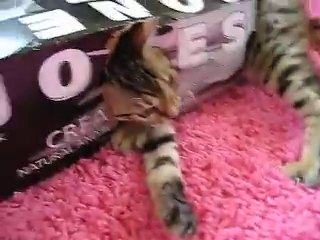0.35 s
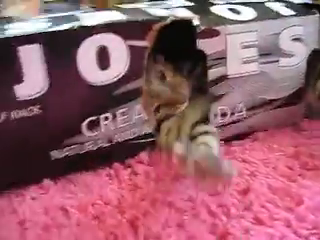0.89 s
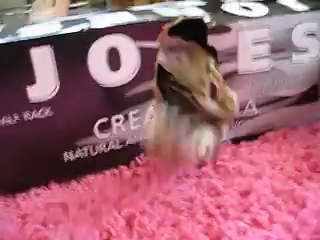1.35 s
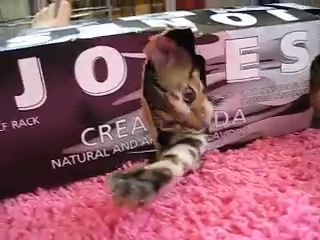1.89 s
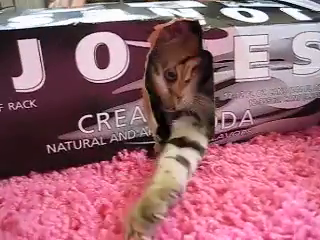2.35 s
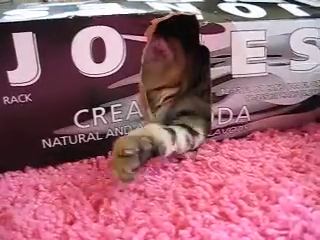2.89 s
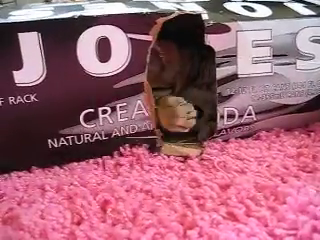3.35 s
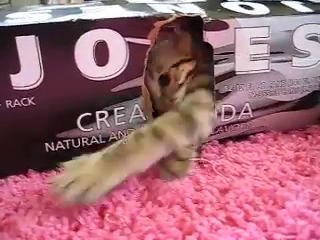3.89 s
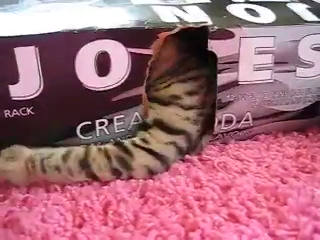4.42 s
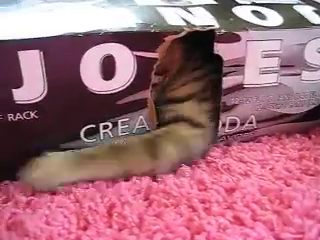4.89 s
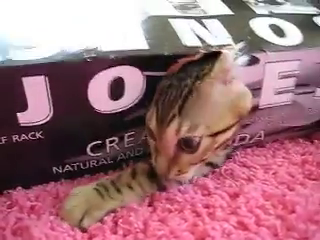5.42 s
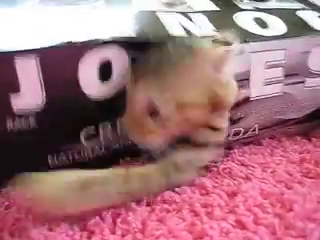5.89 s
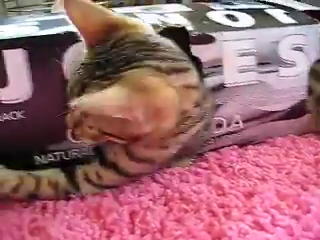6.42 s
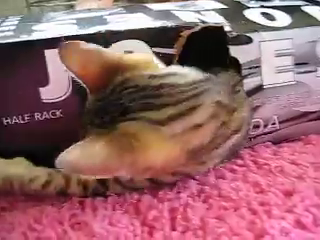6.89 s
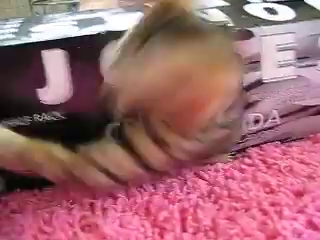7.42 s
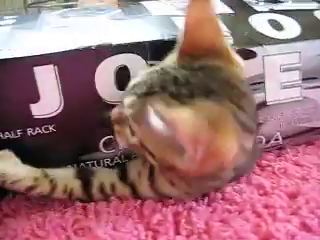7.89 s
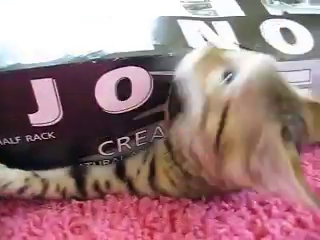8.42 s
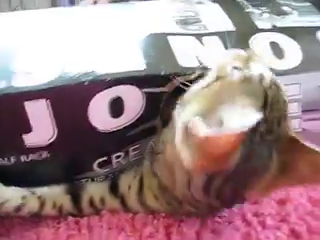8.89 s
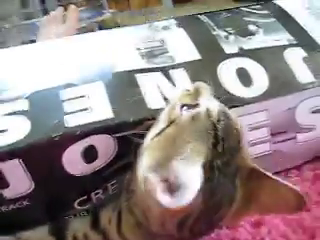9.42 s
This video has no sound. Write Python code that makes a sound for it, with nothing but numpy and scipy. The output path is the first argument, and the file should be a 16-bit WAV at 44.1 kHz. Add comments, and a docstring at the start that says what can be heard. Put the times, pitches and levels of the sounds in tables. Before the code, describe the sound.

A quiet carpeted room with steady soft hiss, barely audible hum and whine, and a faint wavering vent, heard through a close, slightly rough camera microphone. A tiny claw snap comes at 0.5 s, then a solid hollow cardboard knock at 1.0 and a lighter knock with a brief scrape at 1.4. A small bump at 1.9 leads into a near-quiet stretch of faint fur brushing. Soft low taps come at 3.6, a sharp bright knock at 4.1, and a harder cracking pair around 4.3 with short scratches. The draught rises slightly until about 5. Rubbing at 5.3 leads to a busy flurry from 5.9 to 6.4: thuds, a loud clack at 6.2 and quick claw drags. Lighter bumps follow at 6.7 and 6.8. From 7.5 to 7.75 claws tick and rasp strongly across the board. Gentle brushing follows, then small dull taps and ticks from 8.9 to 9.5.

```python
"""In a quiet room, a kitten moves inside a thin cardboard box on a thick rug, close to a camera microphone.
Paws knock the walls: each blow is a decaying swing of the wall plus its other modes. Claws tick, drag and
scrape: random impulses and fibre catches excite the board's resonances. Fur brushes the edge of a torn hole
as rough noise under swelling pressure. The room adds shaped hiss, a wavering vent, hum and whine as sines,
and a short answer of decaying noise."""
import sys
import numpy as np
from scipy import signal
from scipy.fft import rfft, irfft, next_fast_len
from scipy.io import wavfile
from scipy.ndimage import uniform_filter1d, map_coordinates

SR = 44100
rng = np.random.default_rng(int(sys.argv[2]) if len(sys.argv) > 2 else 0)


def boost_factor(decibels):
    """Convert a level in decibels to a linear amplitude factor."""
    exponent = np.asarray(decibels, float) / 20
    return 10 ** exponent


def persist_wave(psi):
    """Save psi, clipped to +-1, as 16-bit WAV."""
    counts = np.round(np.clip(psi, -1, 1) * 32767).astype(np.int16)
    wavfile.write(sys.argv[1], SR, np.atleast_2d(counts).T)


N = 420273


def unit(x):
    """Normalisation: scale to rms 1."""
    return x / np.sqrt(np.mean(x ** 2) + 1e-20)


def along(points, hz):
    """Logarithmic interpolation: (Hz, value) points read on a log frequency axis."""
    f, v = np.transpose(points)
    return np.interp(np.log(hz + 1), np.log(f + 1), v)


def wobble(rate):
    """Band-limited random modulation: a smooth curve with rate knots a second."""
    knots = rng.standard_normal(int(N * rate / SR) + 4)
    return map_coordinates(knots, [np.arange(N) * rate / SR])


def filtered(x, response):
    """Linear filtering: the spectrum of x times a complex response of frequency."""
    m = next_fast_len(len(x) + 8192)
    return irfft(rfft(x, m) * response(np.fft.rfftfreq(m, 1 / SR)), m)[:len(x)]


def modes(table):
    """Modal superposition: a causal sum of resonances of alternating sign."""
    def response(f):
        total = 0
        for k, (centre, width, db) in enumerate(table):
            total = total + (-1) ** k * boost_factor(db) * 1j * f * width / (centre * centre - f * f + 1j * f * width)
        return total
    return response


def catches(n, per_s, spread_db, smooth):
    """Friction force: random fibre catches of uneven size over a smooth rub, rms 1."""
    size = boost_factor(spread_db * np.clip(rng.standard_normal(n), -2, 2))
    grains = (rng.random(n) < per_s / SR) * size * rng.choice([-1, 1], n)
    return unit(unit(grains) + smooth * rng.standard_normal(n))


def patchy(x, depth_db):
    """Spectral modulation: neighbouring bands trade strength, as when a contact point wanders; rms 1."""
    z = signal.stft(x, nperseg=256)[2]
    over_hz = uniform_filter1d(rng.standard_normal(z.shape), size=3, axis=0)
    field = uniform_filter1d(over_hz, size=8, axis=1)
    return unit(signal.istft(z * boost_factor(depth_db * unit(field)), nperseg=256)[1][:len(x)])


# spectrum shape of the room and microphone hiss: pitch_hz [Hz], density_db [dB per Hz, relative]
HISS = [(15, -33), (25, 4), (59, -2.5), (130, -5), (242, -2.5), (293, -3.5), (516, -8.5), (714, -5),
        (863, -6), (1370, -3.5), (2910, -11), (3720, -11), (12200, -19), (14400, -14), (16000, -23.5)]
# mains hum and electrical whine: pitch_hz [Hz], level_db [dB rms, about which it wavers]
TONES = [(59.2, -64), (7558, -75.5)]
# whistles of a distant vent: pitch_hz [Hz], width_hz [Hz, of one pass], level_db [dB, levelled out later]
VENT = [(1040, 350, 0), (1356, 260, -2)]
# the vent's draught: start_s [s], level_db [dB, midway between whistles], upper_over_lower_db [dB]
DRAUGHT = [(0, -59, -10), (.9, -58, -9), (2.5, -62.5, -2.5), (4.2, -55.5, -3), (4.6, -51.5, 3),
           (5.0, -53.5, 5), (5.3, -69, -8), (5.72, -63, 9), (6.0, -55.5, -8), (7.2, -62.5, 2),
           (9.53, -58, -6)]


def air():
    """Stationary noise and tones: room hiss, resonant noise from a wavering vent and faint sines."""
    hiss = unit(filtered(rng.standard_normal(N), lambda f: boost_factor(along(HISS, f))))
    # each whistle passes its resonance twice
    lower, upper = [patchy(filtered(rng.standard_normal(N), lambda f: modes([row])(f) ** 2), depth_db=2.5)
                    for row in VENT]
    t = np.arange(N) / SR
    start_s, *columns = np.transpose(DRAUGHT)
    draught_db, upper_db = [np.interp(t, start_s, column) for column in columns]
    vent = boost_factor(draught_db - upper_db / 2) * lower + boost_factor(draught_db + upper_db / 2) * upper
    tones = 0
    for hz, db in TONES:
        tones = tones + np.sqrt(2) * boost_factor(db + .8 * wobble(5.3)) * np.sin(2 * np.pi * hz * t)
    return boost_factor(-49.5 + 0.058 * wobble(0.86)) * hiss + boost_factor(0.45 * wobble(2.3)) * vent + tones


# resonances of the box walls: pitch_hz [Hz], width_hz [Hz], level_db [dB]
WALLS = [(150, 72, -2), (246, 53, -2), (384, 89, -1), (520, 118, 1.5), (776, 170, 1), (1017, 152, 0),
         (1410, 330, -3.5)]
# resonances of the board itself: pitch_hz [Hz], width_hz [Hz], level_db [dB]
BOARD = [(2103, 525, -4), (2640, 284, -1), (3100, 540, -5), (3900, 450, 1), (4500, 3070, -6),
         (6790, 2260, -6.5), (9430, 5300, -17.5)]
# least gain of each layer, as the kitten is never still: flex, drumming, scratch, rasp [dB]
FIDGET_DB = [-66.5, -60, -65.5, -70]


def rubbing():
    """Friction-driven resonance: body, fur and claws flex and drum the walls, scratch and rasp the board."""
    (drum, flex), (scratch, rasp), skid = shoves(), brushes(), skids()
    moves = flex, drum, np.hypot(scratch, skid), np.hypot(rasp, boost_factor(-2.5) * skid)
    flex, drum, scratch, rasp = [np.hypot(gain, boost_factor(db)) for gain, db in zip(moves, FIDGET_DB)]
    stick = wobble(35) + 1.53 * wobble(120)  # the grip comes and goes, felt in every band

    low = unit(filtered(catches(N, 200, spread_db=3.0, smooth=0.67), modes(WALLS[:3])))
    mid = filtered(catches(N, 600, spread_db=5.0, smooth=0.89), modes(WALLS[3:]))
    mid = patchy(mid, depth_db=1.5)

    claws = catches(N, 1500, spread_db=3.0, smooth=0.99)
    dull = filtered(filtered(claws, modes(BOARD[:3])), modes([(2600, 1860, 0)]))
    dull = patchy(dull, depth_db=2.2)
    # high-pass at 3 kHz, gentle roll-off from 12 kHz
    edge = lambda f: (1j * f / (1j * f + 3000)) ** 2 / (1 + 1j * f / 12000)
    bright = patchy(filtered(filtered(claws, modes(BOARD[3:])), edge), depth_db=1.8)

    on_walls = boost_factor(1.29 * stick) * (flex * low + drum * mid)
    on_board = boost_factor(0.75 * stick) * (scratch * dull + rasp * bright)
    return on_walls + on_board


# decay of the room's answer: pitch_hz [Hz], t60_s [s]
ROOM = [(150, 0.28), (1000, 0.26), (4000, 0.38), (12000, 0.18)]


def room(x):
    """Reverberation: a short decaying noise tail, drawn anew each quarter second as the box shifts."""
    out, step = np.zeros(N + SR), SR // 4
    for a in range(0, N, step):
        hz, t, z = signal.stft(rng.standard_normal(SR // 4), SR, nperseg=256)
        decay = boost_factor(-60 * t / along(ROOM, hz)[:, None])
        tail = signal.istft(z * decay, SR, nperseg=256)[1]
        wet = signal.fftconvolve(x[a:a + step], tail / np.linalg.norm(tail))
        out[a + 300:][:len(wet)] += wet  # 300 samples of delay
    return out[:N]


# bare claw tips snapping free of a fibre: start_s [s], level_db [dB energy before the high-pass]
SNAPS = [(0.4949, -11), (0.4998, -19), (9.352, -21)]


def snaps():
    """Impulsive release: a click and a noise burst gone within milliseconds, high-passed, with no ring."""
    out, t = np.zeros(N + SR), np.arange(SR // 100) / SR
    for s, db in SNAPS:
        burst = (t == 0) + 0.25 * rng.standard_normal(len(t)) * boost_factor(-60 * t / 0.003)
        out[round(s * SR):][:len(t)] += boost_factor(db) * burst / np.linalg.norm(burst)
    return filtered(out[:N], lambda f: (1j * f / (1j * f + 1800)) ** 4)


def strokes(table):
    """Pressure envelope: gain swells to a crest and eases off, for the main layer and its companion."""
    edge_db, roundness = 16, 1.49  # drop from the crest to either end; how round the crest is
    start, crest, end, db, over_db = np.transpose(table)[..., None]
    t = np.arange(0, N, 32) / SR
    away = np.maximum((crest - t) / np.abs(crest - start), (t - crest) / np.abs(end - crest))
    power = boost_factor(db - edge_db * away ** roundness) ** 2
    layers = power, power * boost_factor(over_db) ** 2
    return [np.interp(np.arange(N) / SR, t, np.sqrt(p.sum(axis=0))) for p in layers]


# fur and claws brushing the board, gains before the grip's flutter:
# start_s [s], firmest_s [s], end_s [s], scratch_db [dB], rasp_over_scratch_db [dB]
BRUSHES = [(.66, .79, .9, -43, 0.5), (1.13, 1.19, 1.25, -48, -0.5), (1.25, 1.29, 1.4, -45.5, -1),
           (1.82, 1.89, 1.95, -46.5, 1), (2.11, 2.17, 2.21, -53.5, 5), (2.28, 2.315, 2.36, -47.5, 3),
           (2.6, 2.66, 2.72, -58, -1), (2.98, 3.1, 3.2, -60, 6), (3.24, 3.34, 3.375, -50.5, 5.5),
           (3.545, 3.565, 3.64, -47.5, 4), (3.59, 3.65, 3.75, -46.5, 3), (3.7, 3.76, 3.8, -52.5, 7.5),
           (3.84, 3.99, 4.12, -46.5, 4), (4.19, 4.27, 4.33, -42, -0.5), (4.33, 4.35, 4.43, -39, -11),
           (4.42, 4.45, 4.5, -38.5, -4.5), (4.47, 4.51, 4.6, -49.5, -2), (4.9, 5.02, 5.15, -54, 2),
           (5.17, 5.25, 5.38, -41.5, -0.5), (5.25, 5.35, 5.405, -45, 2.5), (5.87, 5.96, 6.08, -35, -1),
           (6.0, 6.07, 6.2, -38.5, -1.5), (6.1, 6.18, 6.25, -42, -0.5), (6.283, 6.299, 6.308, -23.5, -3.5),
           (6.3, 6.36, 6.43, -41, -1), (6.45, 6.5, 6.6, -52, -8), (6.6, 6.68, 6.72, -44.5, -1.5),
           (6.697, 6.715, 6.75, -37, -3.5), (6.83, 6.88, 6.98, -40, -2.5), (7.02, 7.06, 7.1, -52.5, -3),
           (7.33, 7.43, 7.5, -45, -2.5), (7.45, 7.5, 7.55, -39, 2), (7.555, 7.569, 7.576, -21.5, 0),
           (7.575, 7.6, 7.62, -28, -12), (7.625, 7.68, 7.74, -30, 1.5), (7.68, 7.718, 7.73, -26, -0.5),
           (7.72, 7.75, 7.93, -54, -5), (8.05, 8.16, 8.25, -48, -0.2), (8.12, 8.23, 8.33, -43.5, 1),
           (8.22, 8.34, 8.48, -48.5, -1), (8.41, 8.48, 8.51, -47.5, 3), (8.53, 8.58, 8.62, -55, 4),
           (8.72, 8.82, 8.93, -48.5, -1.5), (8.97, 9.03, 9.06, -42.5, -4), (9.2, 9.255, 9.4, -49.5, -6),
           (9.43, 9.5, 9.6, -47.5, -9)]


def brushes():
    """Sliding friction: gains of dull scratch and bright rasp follow the pressure of each brush."""
    return strokes(BRUSHES)


# legs and body shoving the walls, gains before the grip's flutter:
# start_s [s], firmest_s [s], end_s [s], drumming_db [dB], flex_over_drumming_db [dB]
SHOVES = [(.74, .795, .87, -44, 3.5), (1.015, 1.038, 1.075, -35.5, 4), (1.065, 1.075, 1.113, -53, 10),
          (1.14, 1.19, 1.24, -49, -1), (1.26, 1.32, 1.39, -46, -12), (1.415, 1.44, 1.492, -33.5, -15),
          (1.83, 1.89, 1.94, -36.5, -5), (3.57, 3.61, 3.68, -54.5, 14.5), (3.66, 3.705, 3.74, -44.5, 2),
          (3.7, 3.77, 3.8, -53.5, 10), (3.85, 3.99, 4.07, -51.5, -8), (4.07, 4.08, 4.2, -46, -2),
          (4.268, 4.278, 4.31, -31.5, 3), (4.31, 4.335, 4.42, -35, -2.5), (4.4, 4.46, 4.54, -42, -9),
          (5.18, 5.23, 5.3, -44.5, -5), (5.26, 5.35, 5.405, -37, -14), (5.88, 5.96, 6.01, -37, 0),
          (6.015, 6.03, 6.09, -34.5, 1.5), (6.08, 6.16, 6.2, -40.5, -0.5),
          (6.195, 6.205, 6.25, -27.5, -12.5), (6.278, 6.288, 6.308, -24, -6), (6.32, 6.39, 6.43, -45.5, -9),
          (6.7, 6.72, 6.77, -34.5, -7.5), (6.835, 6.87, 6.93, -33.5, -11.5), (6.96, 7.0, 7.1, -50.5, -6),
          (7.38, 7.49, 7.52, -46, -7), (7.5, 7.52, 7.58, -49.5, 23), (7.54, 7.6, 7.72, -34.5, -3),
          (8.1, 8.25, 8.4, -50, -5), (8.94, 8.95, 9.0, -47.5, 9), (8.97, 9.025, 9.06, -38.5, -3),
          (9.07, 9.085, 9.17, -43, -2), (9.245, 9.29, 9.36, -43.5, -0.5), (9.45, 9.5, 9.6, -38.5, -2)]


def shoves():
    """Forced vibration: gains of wall drumming and slow flexing follow the pressure of each shove."""
    return strokes(SHOVES)


# paw and claw contacts: start_s [s], wall_pitch_hz [Hz], swing_peak_db [dB], tick_peak_db [dB],
# tick_centre_hz [Hz]
TAPS = [(0.7844, 835, -22.5, -32, 2600), (1.026, 880, -6, -14, 2900), (1.03, 1000, -23, -32, 2700),
        (1.0683, 600, -21, -19, 3740), (1.322, 1300.0, -31, -25.5, 3100.0),
        (1.351, 1040.0, -43, -30, 3300.0), (1.4144, 714, -13, -20.5, 3380), (1.915, 920, -30, -23.5, 2740),
        (3.6, 302, -27.5, -50, 3000), (3.6052, 328, -22.5, -47, 4500.0), (4.0706, 545, -5.5, -5, 3100),
        (4.2723, 810, -19.5, -33, 3200.0), (4.2932, 1060.0, -31, -14, 3670),
        (4.3143, 520.0, -25, -17, 2500.0), (4.3266, 613, -8, -0.5, 3100), (4.3342, 865, -10, -9, 4200),
        (4.504, 900.0, -54, -26, 2500.0), (5.221, 150.0, -39, -44, 3900.0), (5.972, 175, -21, -33, 3000.0),
        (6.0185, 334, -14, -26, 2800.0), (6.1088, 503, -18.5, -22, 2500.0), (6.1942, 600, -22, -30, 4600),
        (6.1963, 770, -5, -5, 2500), (6.2017, 750.0, -23, -17, 2760), (6.2197, 900, -9.5, -16, 2400.0),
        (6.276, 700, -19, -18, 3500), (6.717, 423, -30, -20, 3600.0), (6.829, 440, -23, -37, 2800),
        (6.835, 500, -18.5, -27, 2400), (7.5004, 527, -26, -36, 3800.0), (7.512, 237, -14, -36, 3600.0),
        (7.5405, 724, -15.5, -16.5, 4800), (7.587, 870, -16, -8, 3460), (7.5969, 330.0, -33, -4, 2770),
        (7.621, 320.0, -33, -6.5, 2800.0), (7.633, 900, -25, -20, 3600), (8.456, 1300.0, -37, -24.5, 4500),
        (8.858, 1400, -48, -30, 4800), (8.941, 490, -11.5, -29, 2320), (8.9887, 630.0, -26, -28, 2500.0),
        (9.0406, 503, -23, -23, 2290), (9.0443, 185, -19.5, -40, 2300), (9.0751, 570.0, -25, -24, 3400.0),
        (9.083, 900, -24, -19, 3300), (9.0861, 615, -15, -21.5, 2820), (9.141, 590.0, -47, -31, 3700.0),
        (9.2108, 1050, -33, -24.5, 3320), (9.2488, 1100, -27, -26.5, 3400), (9.2506, 1200, -30, -28, 3500),
        (9.2557, 390, -26.5, -45, 2500), (9.2891, 660, -32, -39, 3400.0), (9.4903, 196, -31, -32, 2700.0),
        (9.5036, 660, -20.5, -15.5, 2880)]


def taps():
    """Impact excitation: a contact rocks the wall at its pitch, wakes the other modes and ticks the board."""
    out, t = np.zeros(N + SR), np.arange(SR // 8) / SR
    for s, hz, swing_db, tick_db, tick_hz in TAPS:
        t60 = np.clip(0.023 * (500 / hz) ** 1.01, .005, .2)  # s; large slow panels ring longer
        swing = np.cos(2 * np.pi * hz * t) * boost_factor(-60 * t / (0.76 * t60))
        push = -swing * (1 - np.exp(-t * hz * 6))  # a pad sinks in within a fraction of a swing
        near_wall = lambda f: modes(WALLS)(f) * modes([(hz, 1.2 * hz, 0)])(f)
        rattle = filtered(rng.standard_normal(len(t)) * boost_factor(-60 * t / t60), near_wall)
        thud = push / np.abs(push).max() + 0.43 * rattle / np.abs(rattle).max()

        # a fast burst with a weak slower tail, softened at onset, plus a click
        snap = rng.standard_normal(len(t)) * (boost_factor(-60 * t / 0.0022) + 0.045 * boost_factor(-60 * t / 0.042))
        strike = snap * (1 - np.exp(-t / 0.00023)) + 1.87 * (t == 0)
        # a harder point shifts the weight towards the upper board modes
        tilt = lambda f: (np.minimum(f, 10500) / 3000 + .05) ** (3.5 * np.log(tick_hz / 3100))
        near_claw = lambda f: modes(BOARD)(f) * tilt(f) * modes([(tick_hz, 1.6 * tick_hz, 0)])(f)
        tick = filtered(strike, near_claw)
        out[round(s * SR):][:len(t)] += boost_factor(swing_db) * thud + boost_factor(tick_db) * tick / np.abs(tick).max()
    return out[:N]


def skids():
    """Exponential decay: gain of the scrape as a claw skids on after each tick."""
    skid_db, skid_t60_s = -26.5, 0.13  # start, relative to the tick's peak; decay
    t = np.arange(N) / SR
    power = 0
    for s, _, _, tick_db, _ in TAPS:
        power = power + (t > s) * boost_factor(tick_db + skid_db - 60 * np.abs(t - s) / skid_t60_s) ** 2
    return np.sqrt(power)


# quick claw drags, each singing on the patch of board under the claw:
# start_s [s], end_s [s], level_db [dB rms], centre_hz [Hz], width_hz [Hz]
DRAGS = [(1.418, 1.443, -29, 685, 300), (1.495, 1.609, -41, 550, 300), (3.71, 3.774, -42.5, 5340, 1100),
         (4.293, 4.311, -28.5, 2470, 1200), (4.327, 4.341, -20, 3050, 700), (5.29, 5.394, -38.5, 2890, 600),
         (5.31, 5.403, -37, 800, 350), (6.2, 6.211, -24, 2700, 1500), (6.284, 6.311, -27.5, 3200, 2500),
         (6.317, 6.421, -36.5, 2030, 500), (6.701, 6.731, -31, 3200, 1900), (6.777, 6.795, -42, 500, 120),
         (7.56, 7.581, -23.5, 3030, 700), (7.628, 7.736, -22.5, 2270, 900), (7.646, 7.73, -24, 3830, 900),
         (7.695, 7.735, -37, 835, 200)]


def drags():
    """Stick-slip: a claw bites (short drags at once, long ones gradually), stutters on fibres and lets go."""
    out = np.zeros(N + SR)
    box = modes(WALLS + BOARD)
    for start, end, db, hz, width_hz in DRAGS:
        length = end - start
        t = np.arange(round(length * SR)) / SR
        bite = np.clip(np.exp(-length / 0.11) + t / (0.39 * length), 0, 1)
        release = np.clip((length - t) / 0.011, 0, 1)
        slip = boost_factor(2.4 * wobble(318.5)[:len(t)])  # the claw holds, jumps and holds again
        force = bite * release * slip * catches(len(t), 1200, spread_db=3, smooth=0.43)
        force = np.pad(force, (0, SR // 20))  # time to ring out
        sound = filtered(force, lambda f: box(f) * modes([(hz, width_hz, 0)])(f))
        out[round(start * SR):][:len(sound)] += boost_factor(db) * sound / np.std(sound[:len(t)])
    return out[:N]


def scene():
    """Superposition: the box, its answer from the room and the room's own air."""
    box = rubbing() + taps() + drags() + snaps()
    return (box + boost_factor(-16.5) * room(box) + air())[None]


def low_pass(x):
    """Removes everything above the highest recorded frequency."""
    return signal.sosfilt(signal.butter(12, 16860, fs=SR, output="sos"), x)


def record(dry):
    """Transduction: the microphone drops deep bass, the input clips hard blows softly, the band ends steeply."""
    heard = filtered(dry[0], lambda f: (1j * f / (1j * f + 55)) ** 2 / (1 + 1j * f / 14000))
    clipped = heard / (1 + np.abs(heard / .74) ** 6) ** (1 / 6)  # ceiling of 0.74
    mix = filtered(clipped, lambda f: 1 / (1 + (f / 15750) ** 150))[None]
    return low_pass(mix)


dry = scene()
out = record(dry)
persist_wave(out)
```